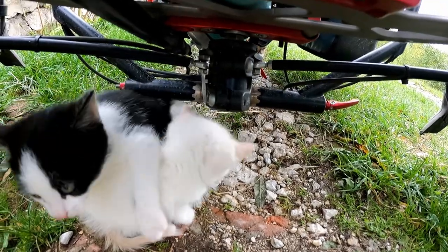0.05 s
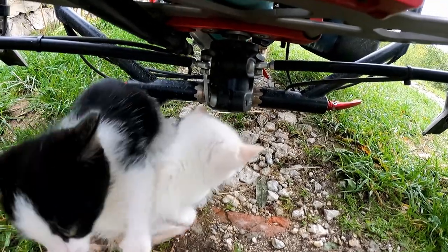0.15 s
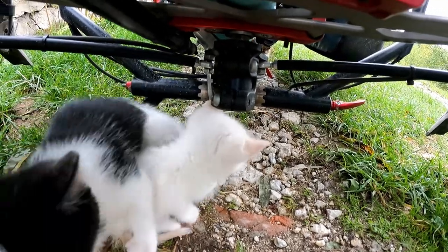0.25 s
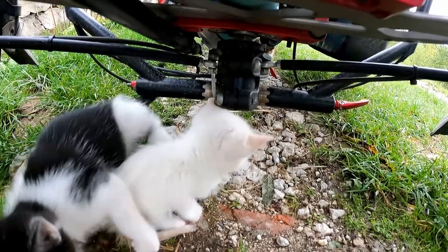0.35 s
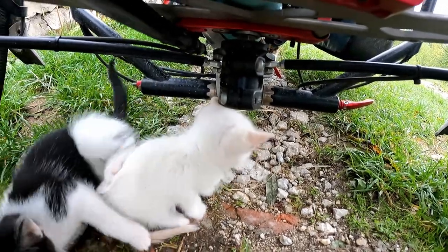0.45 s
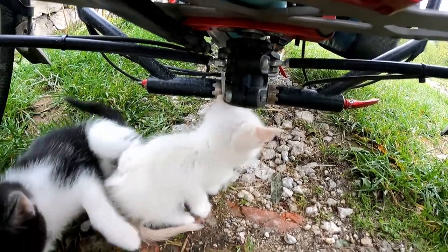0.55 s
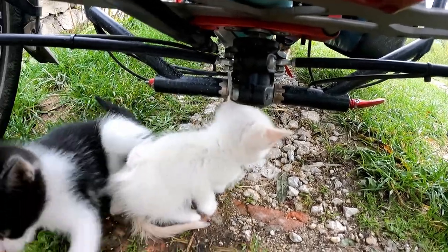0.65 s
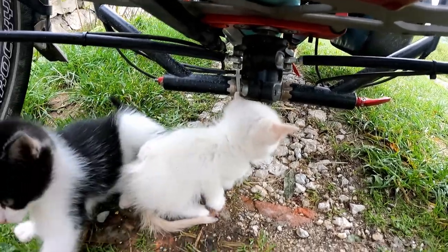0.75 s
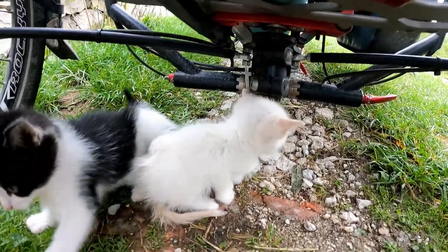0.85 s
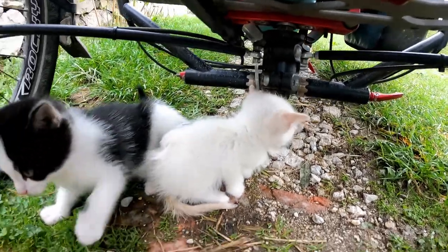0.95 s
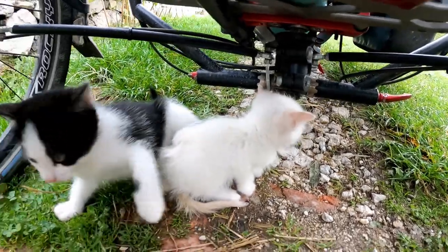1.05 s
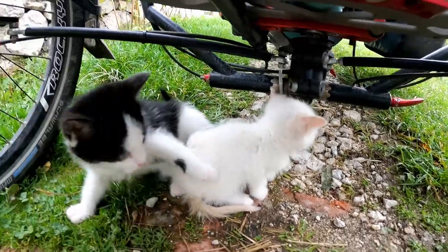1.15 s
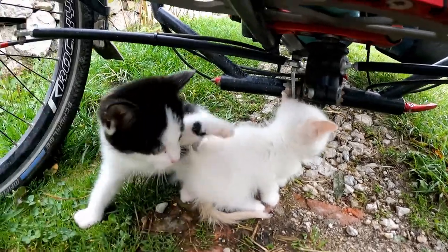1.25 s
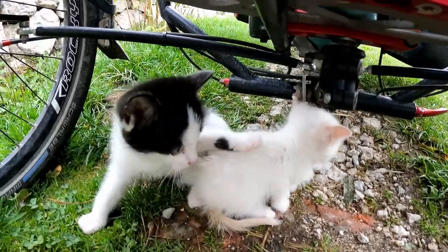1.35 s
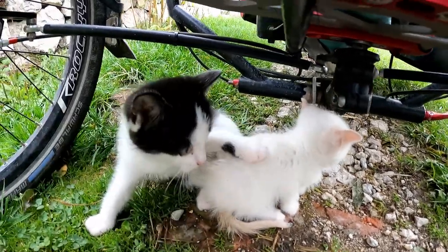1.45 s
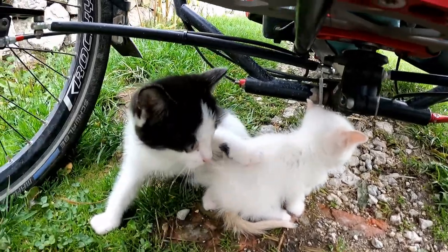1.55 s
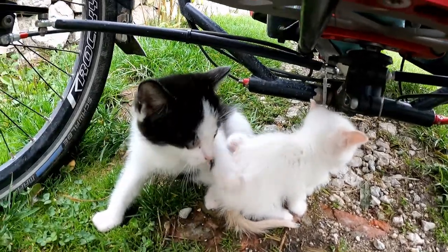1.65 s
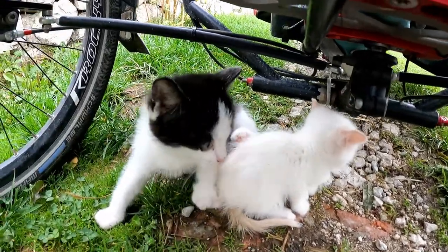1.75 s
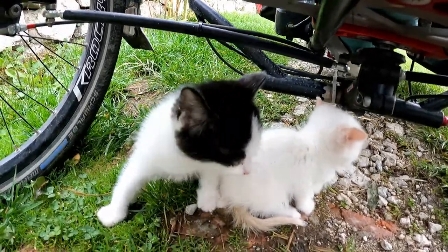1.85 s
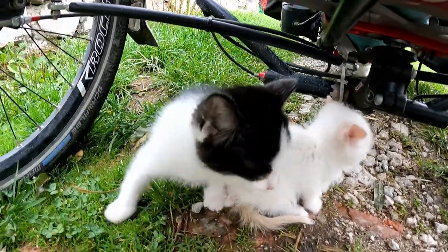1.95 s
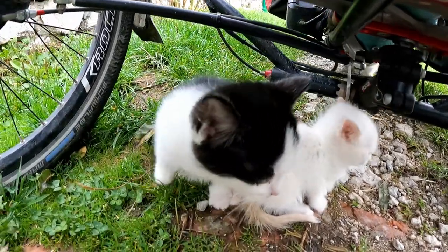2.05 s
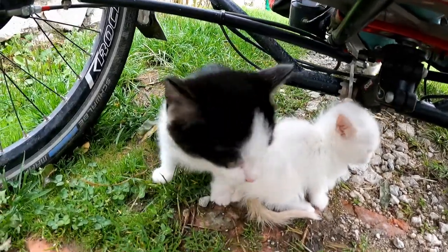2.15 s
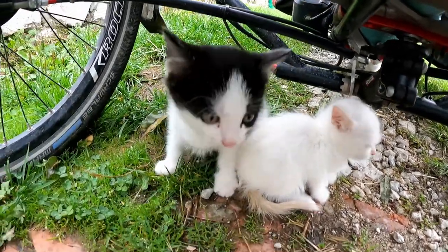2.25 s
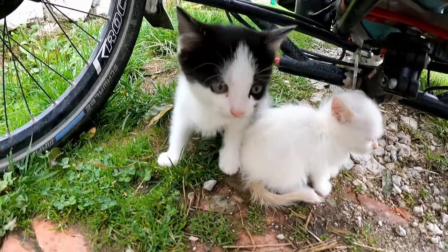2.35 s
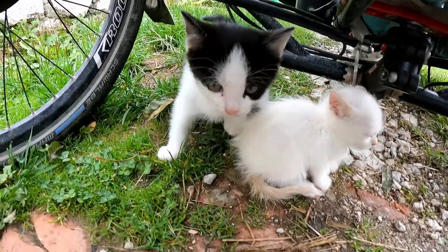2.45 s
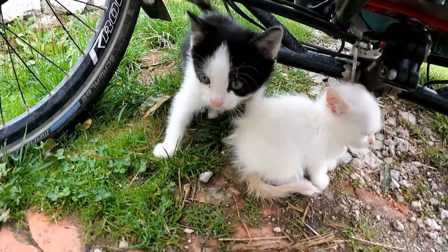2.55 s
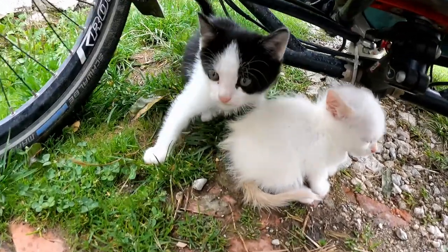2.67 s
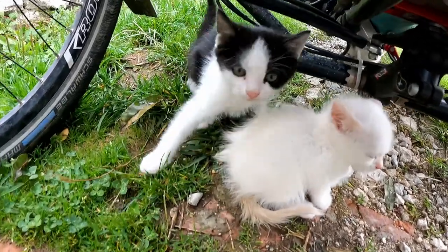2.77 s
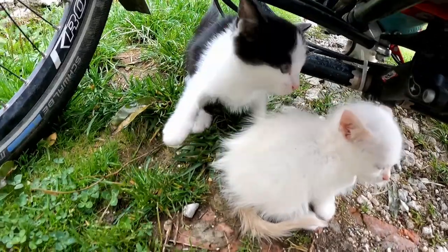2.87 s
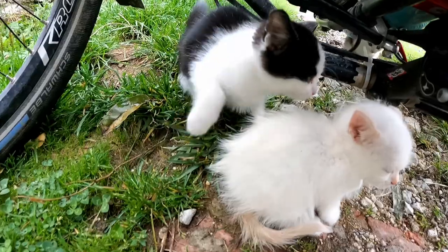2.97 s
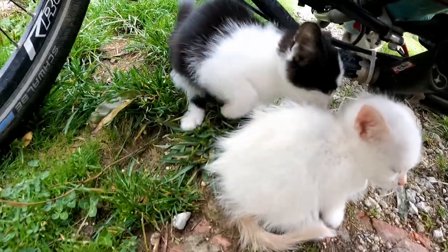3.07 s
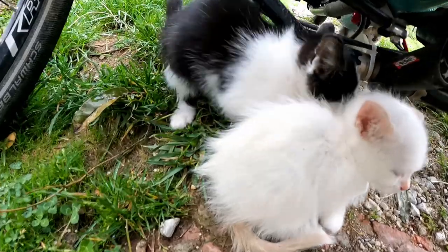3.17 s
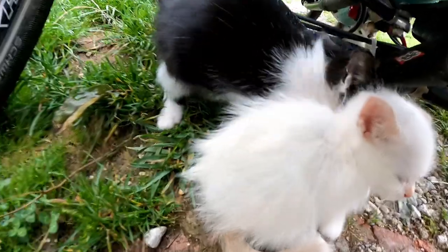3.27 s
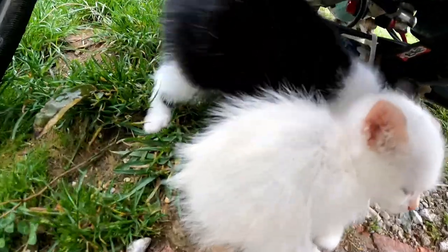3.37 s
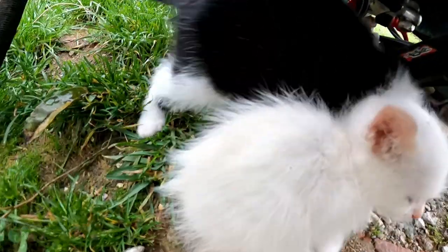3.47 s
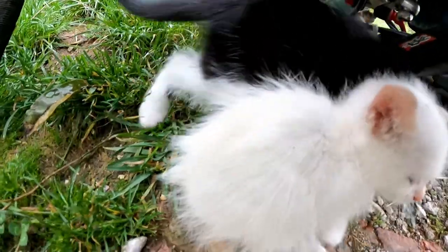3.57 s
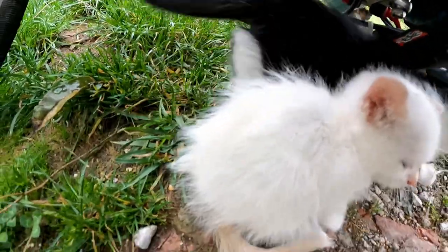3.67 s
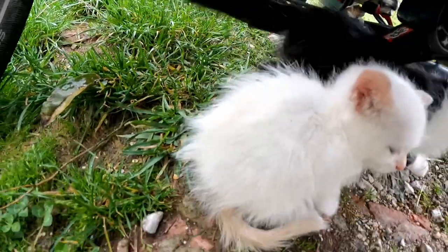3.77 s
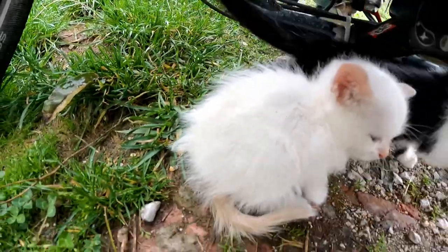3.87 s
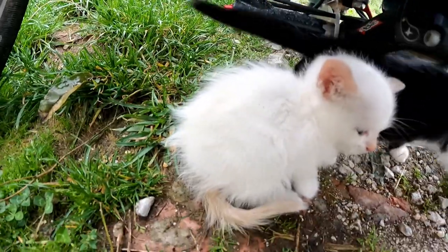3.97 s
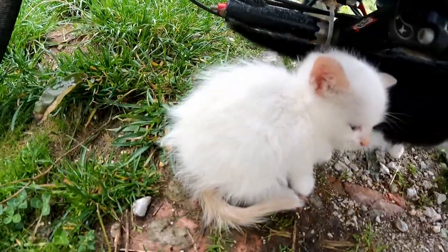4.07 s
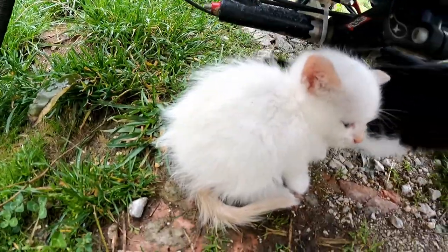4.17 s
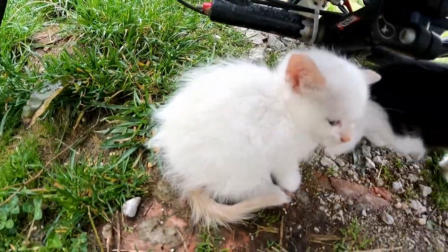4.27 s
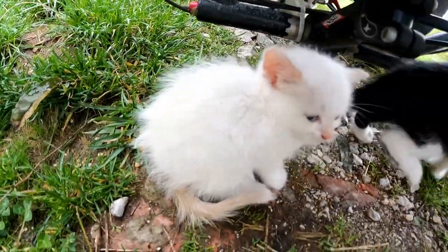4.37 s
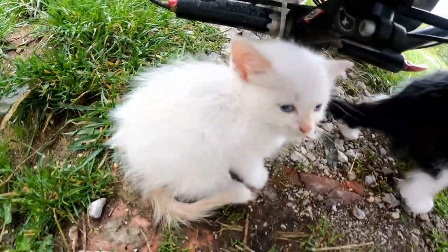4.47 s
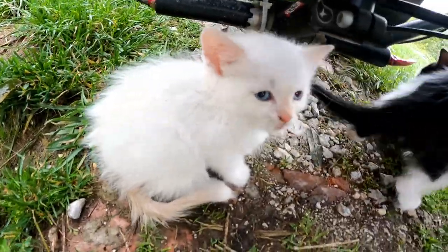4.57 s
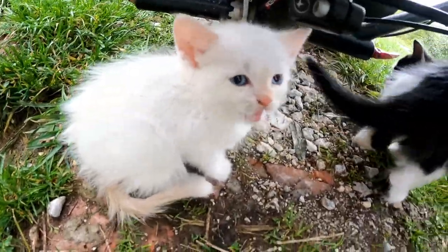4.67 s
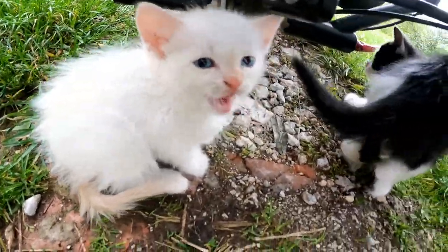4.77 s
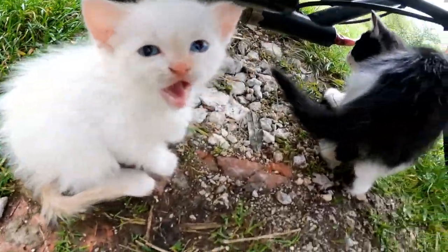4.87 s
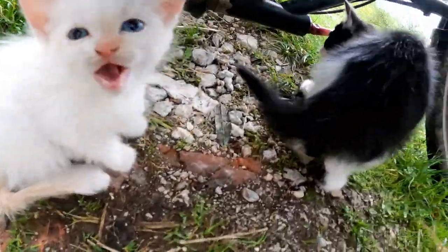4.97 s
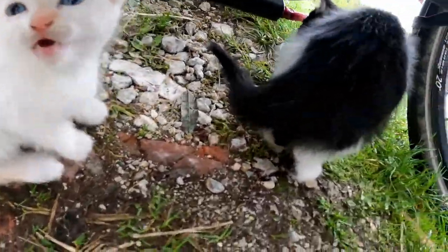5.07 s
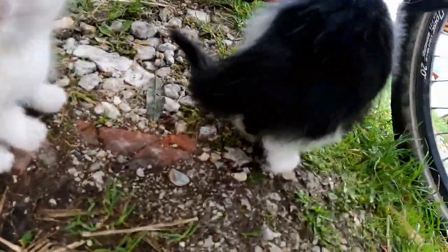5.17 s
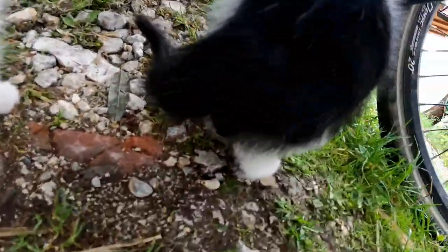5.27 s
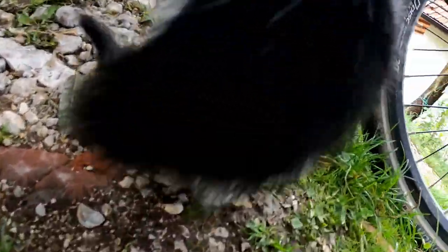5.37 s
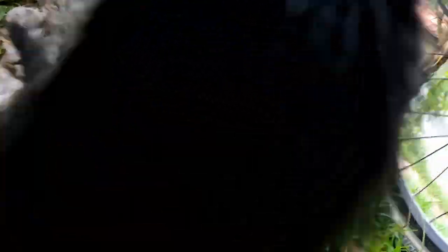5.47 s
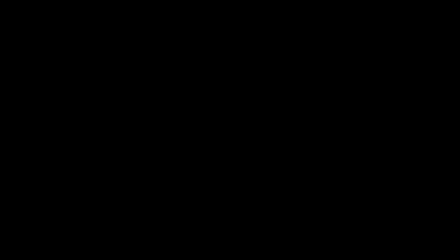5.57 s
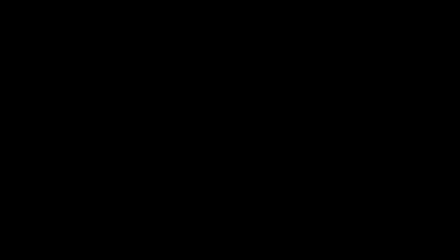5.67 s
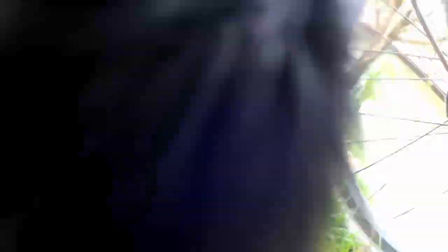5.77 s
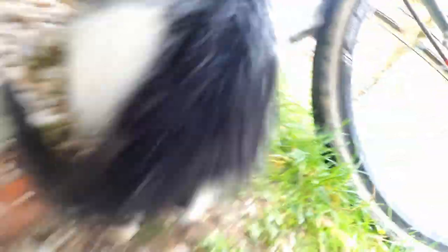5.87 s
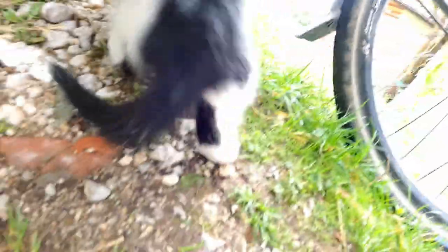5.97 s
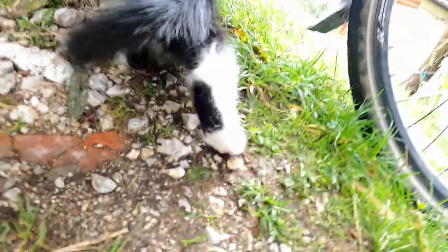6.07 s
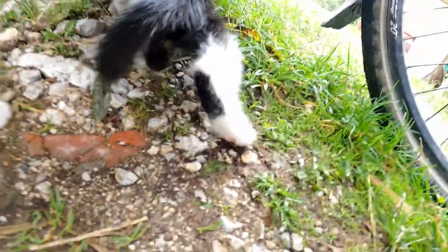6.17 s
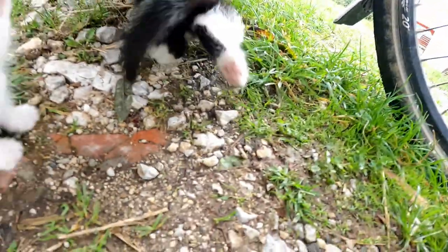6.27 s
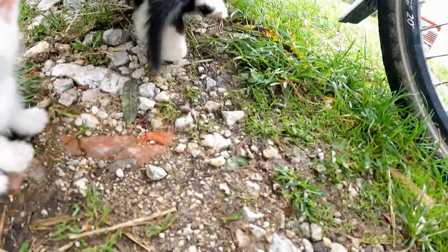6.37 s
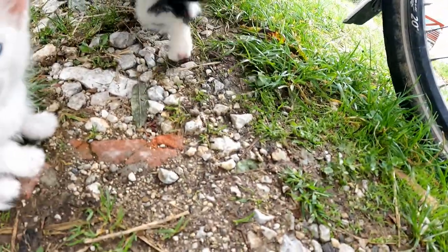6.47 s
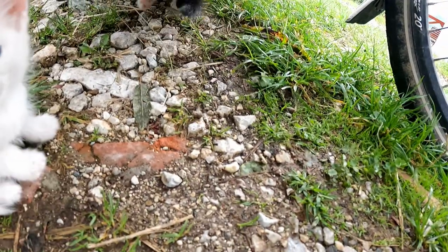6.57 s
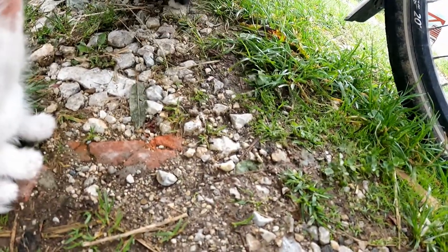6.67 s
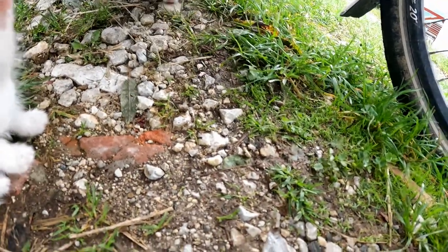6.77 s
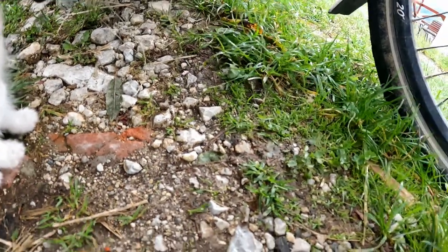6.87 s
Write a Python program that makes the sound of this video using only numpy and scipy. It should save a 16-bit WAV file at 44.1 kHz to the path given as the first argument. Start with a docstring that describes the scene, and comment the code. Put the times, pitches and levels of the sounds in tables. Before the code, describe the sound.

Outdoors, a small handheld microphone close to kittens on gravel, with faint hiss, a weak wavering low hum and soft fur rustle. A barely audible squeak comes at 0.1 s. From 0.5 to 1.5 s a clear, thin mew glides quickly up, holds, then slides down. A soft low bump at 1.6 s and small dry ticks around 1.9 to 2.3 s follow, then near quiet. At 3.35 to 3.5 s very loud, hard knocks strike in a rapid cluster with gritty scraping and a brief ringing edge. From 4.6 to 5.45 s comes a second mew, brighter and rougher, rising, cracking with breathy rasp, then falling. Small taps come at 5.3 s. At 5.65 s a heavy, deep thump hits the housing with a knock and rumble; scuffs continue to 5.9 s. A short solid clack lands at 6.4 s, then faint rustle.

```python
"""Kittens mew: stacks of harmonics on gliding pitches, lifted by resonances of mouth and housing; the last call
cracks and breathes, and its mouth closes with a short knock. Around them paws and fur rustle (grainy noise in
bands) beside a bicycle lying on gravel. Pebbles and bicycle parts get knocked (decaying modes) and a small
camera's closed housing is bumped (low swings). Handling rumble, a wavering low outdoor hum and faint hiss, all
banded noise, lie underneath."""
import sys
import numpy as np
from scipy import signal
from scipy.io import wavfile
from scipy.ndimage import uniform_filter1d

SR = 44100
rng = np.random.default_rng(int(sys.argv[2]) if len(sys.argv) > 2 else 0)


def master_out(mix):
    """Clip the mix to full scale and print it as 16-bit PCM to the path in sys.argv[1]."""
    frames = np.transpose(np.atleast_2d(mix))
    ceiling = np.clip(frames, -1, 1)
    pcm = np.round(ceiling * 32767).astype(np.int16)
    wavfile.write(sys.argv[1], SR, pcm)


N = 305613
T = np.arange(N) / SR

# Mews, one curve per call: time_s, pitch_hz, level_db of the fundamental before the resonances, # second_db and
# third_db (harmonics relative to it), fall_db per higher harmonic (small = mouth wide open)
MEW_CURVES = [
    [(.06, 547, -69.5, -25, 0, -25), (.08, 555, -68, -22.5, -11, -25), (.15, 528, -67, -25.5, -34, -25.5),
     (.18, 550, -88, -20, 0, -21)],
    [(.495, 525, -57.5, 2, 4, -24), (.512, 562.5, -47, 3, -19.5, -10), (.55, 526, -47.5, -7, -8.5, -11.5),
     (.568, 669, -55.5, -3, -15, -12), (.6, 762, -47, -4, -22, -19), (.65, 874, -40.5, -14, -37.5, -21),
     (.7, 1002, -38, -22.5, -58, -8), (.76, 1096, -42, -10.5, -26, -13.5),
     (.81, 1132, -38.5, -5, -24.5, -10), (.88, 1147, -41.5, -9, -16, -11), (.95, 1138, -43, -3, -16.5, -12),
     (1.03, 1106, -43.5, -0.5, -20, -15), (1.075, 1073, -42, 0.5, -20, -31.5),
     (1.12, 1037, -42.5, -9.5, -34.5, -27), (1.16, 1021, -36, -16, -57, -15),
     (1.27, 909.4, -34.5, -14, -63, -7.5), (1.35, 822.5, -35, -10, -58, -10.5),
     (1.43, 735.5, -40, -8, -50, -12), (1.465, 703, -50, -3, -11.5, -40), (1.5, 635, -47.5, -10, -8, -39),
     (1.52, 626, -50.5, -2, -16, -24)],
    [(4.565, 1187, -55.5, -20, -65, -9), (4.64, 1366, -50, -4, -26, -9),
     (4.69, 1426, -52.5, -1.5, -6, -9.5), (4.73, 1422, -51.5, 2.5, -1.5, -9.5),
     (4.8, 1355, -52, -1, -7, -6.5), (4.9, 1374, -53.5, 0, -6, -9)],
    [(4.592, 927, -50.5, -32, -12.5, -23), (4.603, 716, -50, -8, -8, -21),
     (4.613, 627, -50.5, -11, -25, -16), (4.625, 630, -52, -23, -21, -8)],
    [(4.6, 766, -87, -18, 6, -20), (4.625, 837, -45.5, -15, -8, -30), (4.66, 844, -43, -19, -23, -20),
     (4.7, 876, -48, -9, 4, -14), (4.73, 932, -44.5, -14, -12, -14), (4.76, 1034, -45, -0.5, -11.5, -4.5),
     (4.79, 1143, -43.5, 1.5, -7, -7), (4.82, 1170, -44, 0, -3.5, -6.5), (4.86, 1197, -39, 6.5, -13, -7.5),
     (4.9, 1224, -37, 4.5, -10.5, -8), (4.96, 1188, -36.5, 4.5, -12, -7), (5.01, 1162, -38, 5.5, -10, -7.5),
     (5.045, 1187, -35, 3.5, -9, -10.5), (5.065, 1128, -36, 3, -12, -7.5),
     (5.135, 1110, -37, 0.5, -22.5, -10), (5.165, 1044, -36, 5, -31.5, -5),
     (5.22, 997, -39.5, -4.5, -36, -5), (5.26, 952, -43.5, -13.5, -34.5, -4.5),
     (5.31, 911, -45.5, -11, -20, -14.5), (5.36, 849.5, -47.5, -3.5, -16, -13.5),
     (5.44, 784, -46.5, -9.5, -21, -15)],
]
LAST_MEW = MEW_CURVES[-1]
# Roughness of each call: one factor_0_to_1 per mew
MEW_ROUGHNESS = [.25, .07, .05, .2, .035]
# Resonances of mouth and housing that lift a passing harmonic: centre_hz, width_hz, lift_db
RESONANCES = [(915, 320, 1.5), (2100, 110, 6.5), (3102, 620, 2), (4000, 210, 2), (5300, 590, 16),
              (7100, 660, 7)]
# Lines between the harmonics while the voice cracks: multiple_of_pitch, level_db
HALF_LINES = [(.5, -11.5), (1.5, 0), (2.5, 2), (3.5, -8.5), (4.5, -8.5), (5.5, -42), (6.5, -39)]
CRACK_START_S, CRACK_END_S, CRACK_EDGE_S, CRACK_DB = 4.796, 5.052, 0.0092, -38
CRACK_ROUGHNESS = .24  # added to the call's own
SLIP_DB = 3  # how much each half line comes and goes

# Breath through the open mouth, two body bands and then the treble: centre_hz, width_hz, level_db
BREATH_BANDS = [(1730, 1560, -16.5), (2547, 1070, 0), (3800, 3400, -13.5), (5560, 1200, -6.5),
                (6540, 820, -21.5), (10230, 3400, -46.5), (13600, 2300, -36.5)]
# Strength of the breath before puffs and spurts: time_s, level_db
BREATH_CURVE = [(4.59, -100), (4.64, -71.5), (4.74, -59), (4.765, -49), (4.8, -44), (4.89, -42.5),
                (4.95, -39.5), (5.04, -47), (5.06, -53), (5.14, -60), (5.18, -85.5), (5.46, -96)]
BRIGHT_POWER = .4  # extra treble dB per dB of breath level

# Scuffs of paws and hand on gravel and housing: full_s (rise ends, hold begins), rise_s, hold_s, fall_s, level_db,
# then low_middle_db, treble_db, top_treble_db relative to it
SCUFFS = [(0.498, 0.012, .01, 0.045, -69, 14.5, -18.5, -19),
          (1.628, 0.0054, 0.013, 0.014, -64.5, -31, -3.5, -30),
          (1.75, 0.018, 0.021, 0.022, -72.5, -6, -11.5, -31),
          (1.839, 0.016, 0.042, 0.022, -66.5, -2.5, -6.5, -27),
          (1.909, 0.011, 0.034, 0.018, -60.5, -7, -2, -26.5), (2.03, .02, 0.055, .02, -84.5, -8, -8, -25),
          (2.29, 0.014, 0.051, 0.18, -77, -9, -21, -15), (3.343, 0.0098, .005, 0.014, -41.5, 3, -30, -29.5),
          (3.379, 0.0063, 0.036, .008, -33, 0, -19.5, -26),
          (3.442, .003, .01, .006, -28, -0.5, -20.5, -27.5),
          (3.469, .003, 0.016, 0.004, -36.5, 4.5, -19, -35),
          (3.498, 0.0044, 0.0084, 0.099, -73.5, 9, -11, -9),
          (5.342, 0.0081, 0.042, 0.012, -61.5, -4.5, -10, -8.5),
          (5.478, 0.035, 0.0085, 0.025, -67, -4.5, -24.5, -27),
          (5.637, 0.0073, 0.051, 0.049, -43.5, 0, -13.5, -12.5),
          (5.788, 0.033, 0.012, 0.031, -52.5, 6.5, -11, -7),
          (5.88, 0.0086, 0.019, 0.015, -50.5, -1, -23, -25),
          (5.928, .02, 0.018, 0.0052, -59, -12, -25, -31),
          (6.394, 0.007, 0.017, .006, -50.5, -2, -31.5, -46),
          (6.475, 0.011, .015, 0.0084, -62.5, 2.5, -23, -30),
          (6.5, 0.014, .01, 0.0098, -54.5, 4.5, -23, -33)]
# Quiet stirring of fur and grass: time_s, level_db
STIR_CURVE = [(0, -87), (.19, -77.5), (.3, -81), (.38, -73.5), (.5, -83), (.66, -76), (1.5, -84.5),
              (2.12, -90), (2.3, -85.5), (2.6, -87), (2.8, -81.5), (2.95, -76), (3.2, -75.5), (3.3, -86.5),
              (3.6, -75.5), (3.76, -86.5), (4.22, -94), (5.3, -84), (6.18, -83), (6.61, -90.5),
              (6.9, -80.5)]
STIR_LOW_DB, STIR_TREBLE_DB = 0, -10.5  # relative to the stirring
# Rustle colour, main range: centre_hz, width_hz, level_db
RUSTLE_MAIN = [(1930, 430, -4.5), (2418, 590, -5), (2919, 400, -13.5)]
# Rustle colour, low-middle range: centre_hz, width_hz, level_db
RUSTLE_LOW = [(430, 260, -12), (923, 510, -6.5), (1298, 500, -3.5)]
# Rustle colour, three treble and three top treble bands: centre_hz, width_hz, level_db
RUSTLE_TREBLE = [(3460, 1100, -1), (4700, 1200, -7.5), (5650, 1200, -12), (7240, 2000, -8),
                 (9100, 2000, -21.5), (13000, 3500, -28)]
# Grit thrown by each broad knock: level under its peak, decay, treble relative to the grit
SPRAY_DB, SPRAY_S, SPRAY_TREBLE_DB = -17.5, 0.005, -19

# Knocks, and the last mew's mouth closing at 5.442 s; entries of narrow spread are short tones, two of them
# just before the loud blow: # start_s, peak_db before the housing thins the bass, centre_hz of the sounding
# part, spread_octaves, # ring_factor on the mode decay
KNOCKS = [(0.443, -55, 1280, 0.5, 0.5), (1.628, -57, 2560, 0.63, 0.47), (1.903, -45, 2930, 0.28, 0.56),
          (1.939, -41.5, 3400, 0.46, 0.15), (1.964, -55, 880, 0.48, 0.33), (2.289, -53, 2300, 0.21, 0.37),
          (2.307, -53, 1980, 0.53, 0.27), (2.954, -50, 1770, 0.51, 0.53), (3.168, -47.5, 1480, 0.96, 0.72),
          (3.354, -8, 2480, 1.4, 0.76), (3.375, -20.5, 812, 0.52, 1.8), (3.404, -20, 809, 0.59, 0.7),
          (3.426, -7, 1210, 0.74, 0.55), (3.441, -21, 2070, 0.86, 0.68), (3.468, -21, 1700, 0.87, 0.45),
          (3.481, -22.5, 2030, 0.8, 0.31), (3.594, -46.5, 1490, 0.35, 0.24),
          (3.877, -69.5, 1650, 0.94, 0.26), (3.942, -49.5, 1860, 0.69, 0.46), (4.447, -55, 986, 1, 0.35),
          (5.629, -44.5, 1890, 0.8, 0.17), (5.687, -28.5, 1080, 0.83, 0.87), (5.877, -47, 1360, 0.82, 0.4),
          (5.896, -50, 2340, 1.05, 0.54), (6.095, -53.5, 2080, 1.05, 0.29), (6.175, -55, 1810, 1.47, 0.42),
          (6.401, -27.5, 1170, 1.08, 0.68), (6.468, -59, 872, 1.1, 0.39), (6.497, -47, 853, 1.6, 0.19),
          (6.704, -63, 1276, 1.16, 0.31), (1.519, -38, 925, 0.081, 0.63), (3.329, -35, 2480, 0.09, 0.52),
          (3.34, -24.5, 2500, 0.093, 2.7), (3.354, -18, 2610, 0.13, 1.1), (3.486, -34, 991, 0.092, 3.3),
          (3.482, -32.5, 1950, 0.12, 0.63), (5.23, -50, 1450, 0.12, 1.4), (5.307, -40, 1794, 0.11, 1),
          (5.34, -39, 1840, 0.27, 0.86), (5.442, -39.5, 860, 0.33, 0.35), (6.388, -44, 2470, 0.11, 0.58),
          (6.402, -47, 5370, 0.4, 0.24)]
# Ringing modes of the struck parts: mode_hz, level_db, t60_s at ring factor 1
PART_MODES = [(573, -2.5, 0.062), (830, -2.5, .06), (918, -3, 0.042), (1029.6, 3.5, 0.035),
              (1225, 8.5, 0.03), (1500, 4.5, 0.018), (1733, 4, .05), (1900, -1.5, 0.089),
              (2188, -1.5, 0.045), (2456, -8.5, .06), (2830, -13.5, .05), (3250, -11.5, 0.084),
              (3800, -19.5, .03), (3940, -18, .03), (5580, -17.5, 0.064), (7175, -27, .02),
              (9510, -43, .015), (13000, -54.5, .01)]
HOUSING_HZ = 552.2  # knocks lose their bass in the small housing

# Bumps of the housing: turn_s (buildup ends, decaying swing begins), swing_db, swing_hz, t60_s, buildup_s
BUMPS = [(1.636, -32.5, 58.2, 0.069, 0.0011), (5.652, -3.5, 40.55, 0.1, 0.0041),
         (5.694, -31, 31.4, 0.66, 0.006)]

# Jolts of the hand-held housing: full_s (rise ends, hold begins), rise_s, hold_s, fall_s, rumble_db, hum_db
JOLTS = [(.01, 0.018, .01, 0.036, -66, -75), (0.285, 0.011, .02, 0.15, -61, -73.5),
         (0.847, 0.034, .02, .07, -61.5, -84.5), (1.49, 0.047, .01, 0.041, -66, -77),
         (1.627, 0.0099, .08, 0.066, -52.5, -65.5), (2.97, 0.017, .01, 0.033, -61, -60.5),
         (3.353, 0.021, .13, 0.037, -40, -49.5), (3.701, 0.052, .02, 0.048, -67.5, -79),
         (2.415, 0.015, 0.0085, .03, -80, -82), (2.715, 0.028, 0.013, .03, -79.5, -67),
         (3.163, .02, .03, .03, -77, -65), (4.101, 0.041, .01, 0.028, -67, -77),
         (4.968, 0.079, .01, 0.054, -63.5, -72.5), (5.36, 0.029, .01, .02, -55, -58.5),
         (5.637, 0.01, .08, 0.043, -35.5, -47.5), (6.107, 0.015, 0.0065, .04, -75.5, -61.5),
         (5.825, 0.043, .01, 0.055, -50, -59), (6.407, 0.032, .05, 0.049, -56, -55.5)]
# Handling rumble: centre_hz, width_hz, level_db
RUMBLE_BANDS = [(32.7, 49, -8.5), (62.56, 34, -5), (93.5, 11, -13)]
# Outdoor hum: centre_hz, width_hz, level_db
HUM_BANDS = [(138.9, 40, -5), (189.6, 70, -1), (270, 90, -9), (363, 180, -18)]
# Far air and preamp hiss: centre_hz, width_hz, level_db
AIR_BANDS = [(437, 260, -89), (593, 75, -88), (1000, 800, -96.5), (1960, 1000, -97.5), (4500, 4000, -100),
             (10000, 13000, -99)]
RUMBLE_DB, RUMBLE_SWAY_DB = -79, 7.5
HUM_DB, HUM_SWAY_DB = -73.5, 3
TOP_HZ = 15500


def mew(table, rough):
    """Harmonics of vocal folds on one pitch, lifted by resonances; roughness shakes each line, a crack adds
    half lines."""
    span = slice(int(table[0][0] * SR), int(table[-1][0] * SR))
    hz, level_db, second_db, third_db, fall_db = (c[span] for c in columns(table))
    hz = uniform_filter1d(hz, size=500, mode="nearest")
    count = len(hz)
    harmonics_db = [0, second_db] + [third_db + fall_db * k for k in range(10)]
    lines = []
    for multiple, relative_db in enumerate(harmonics_db, start=1):
        lines.append((multiple, undb(level_db + relative_db + resonance_lift_db(multiple * hz))))

    if table is LAST_MEW:
        edge_distance_s = np.minimum(T[span] - CRACK_START_S, CRACK_END_S - T[span])
        crack = np.clip(edge_distance_s / CRACK_EDGE_S, 0, 1)
        rough = rough + CRACK_ROUGHNESS * crack
        for multiple, relative_db in HALF_LINES:
            slip_db = SLIP_DB * walk(29.83, count)
            lines.append((multiple, crack * undb(CRACK_DB + relative_db + slip_db)))

    hz = hz * (1 + .015 * rough * walk(80, count))
    phase = 2 * np.pi * np.cumsum(hz) / SR
    voice = np.zeros(N)
    for multiple, gain in lines:
        # uneven cycles smear the higher lines more, in strength and in phase
        wobble = .6 * walk(420, count) + 1j * walk(420, count)
        shake = .6 * rough * multiple ** .9 * wobble
        line = np.exp(1j * (multiple * phase + multiple * multiple))
        voice[span] += np.sqrt(2) * gain * np.imag((1 + shake) * line)
    voice[span] *= signal.windows.tukey(count, 0.0026 * SR / count)
    return voice


def resonance_lift_db(hz):
    """Resonances of the mouth cavity and the housing raise whatever passes near their centres."""
    return sum(lift / (1 + (2 * (hz - centre) / width) ** 2) for centre, width, lift in RESONANCES)


def breath():
    """Turbulent air through the mouth in the last mew, puffed once per two pitch cycles, brighter when strong."""
    during = (T > BREATH_CURVE[0][0]) & (T < BREATH_CURVE[-1][0])
    level_db = columns(BREATH_CURVE)[0]
    pitch_hz = columns(LAST_MEW)[0]
    puffs = 1 + .8 * np.sin(np.pi * np.cumsum(pitch_hz) / SR)
    spurts_db = 2.5 * walk(150)
    body = flicker(BREATH_BANDS[:2], noise, 1.9, 60)
    brightness = undb(BRIGHT_POWER * (level_db - level_db.max()))
    treble = flicker(BREATH_BANDS[2:], noise, 1.602, 60)
    return during * puffs * undb(level_db + spurts_db) * (body + brightness * treble)


def rustle():
    """Grains coloured by the housing, in four ranges: stirring, scuffs and the grit of knocks."""
    stir_colour_db = np.array([[0], [STIR_LOW_DB], [STIR_TREBLE_DB], [STIR_TREBLE_DB]])
    levels = undb(columns(STIR_CURVE)[0] + stir_colour_db)
    sprays = [(s, .002, .001, SPRAY_S, peak_db + SPRAY_DB, 0, SPRAY_TREBLE_DB, SPRAY_TREBLE_DB)
              for s, peak_db, _, spread, _ in KNOCKS if spread > .5]
    for full_s, rise, hold, fall, db, *colour_db in SCUFFS + sprays:
        range_gains = undb(db + np.array([0] + colour_db))[:, None]
        levels = levels + swell(full_s, rise, hold, fall) * range_gains
    ranges = RUSTLE_MAIN, RUSTLE_LOW, RUSTLE_TREBLE[:3], RUSTLE_TREBLE[3:]
    return sum(gain * flicker(bands, grit, 2.2, 60) for gain, bands in zip(levels, ranges))


def grit():
    """Dense single-sample grains of unequal size, about 1500 a second, over a fine brushing."""
    grains = rng.random(N) < 1500 / SR
    size = 6.0 * undb(1.6 * rng.exponential(size=N))
    return noise() * (1 + grains * size)


def knocks():
    """Each entry rings all modes at once, strongest near its centre, in a housing that thins the bass."""
    out, t = np.zeros(N + SR), np.arange(SR // 4) / SR
    mode_hz, mode_db, t60 = np.transpose(PART_MODES)[:, :, None]
    for s, peak_db, centre_hz, spread, ring in KNOCKS:
        level_chance, tuning_chance, phase_chance = rng.standard_normal((3, len(mode_hz), 1))
        near_db = -6 * (np.log2(mode_hz / centre_hz) / max(spread, .05)) ** 2
        near_db = np.maximum(near_db, -12 / spread)
        gain = undb(mode_db + near_db + 3.4 * min(spread, 1) * level_chance)
        hz = mode_hz * (1 + .01 * spread * tuning_chance)
        decay = np.exp(-np.log(1000) * t / (t60 * ring))
        hit = np.sum(gain * np.sin(2 * np.pi * hz * t + .3 * phase_chance) * decay, axis=0)
        push_s = (.0002 - .000015 * peak_db) / spread  # weak and narrow entries swell in longer
        hit = hit * np.sin(np.pi / 2 * np.minimum(t / push_s, 1)) ** 2
        hit = hit / np.abs(hit).max()
        i = int(s * SR)
        out[i:i + len(t)] += undb(peak_db) * hit
    return signal.sosfilt(signal.butter(2, HOUSING_HZ, "high", fs=SR, output="sos"), out[:N])


def bumps():
    """The housing is pushed in, then swings back on its mount as a decaying low sine."""
    out = 0
    for turn_s, db, hz, t60, buildup in BUMPS:
        t = T - turn_s
        envelope = np.exp(np.minimum(t, 0) / buildup - np.log(1000) * np.maximum(t, 0) / t60)
        out = out + undb(db) * envelope * np.sin(2 * np.pi * hz * t)
    return out


def rumble_and_hum():
    """Handling rumble below a wavering outdoor hum, two sets of noise bands both raised by jolts."""
    rumble = undb(RUMBLE_DB + RUMBLE_SWAY_DB * walk(8))
    hum = undb(HUM_DB + HUM_SWAY_DB * walk(16))
    for *shape, rumble_db, hum_db in JOLTS:
        jolt = swell(*shape)
        rumble = rumble + undb(rumble_db) * jolt
        hum = hum + undb(hum_db) * jolt
    return rumble * flicker(RUMBLE_BANDS, noise, 2.6, 15) + hum * flicker(HUM_BANDS, noise, 1.4, 10)


def far_air():
    """Far air and preamp hiss: faint noise bands that waver slowly."""
    return flicker(AIR_BANDS, noise, 1.1, 2.5)


def undb(db):
    """Decibels to amplitude."""
    return 10 ** (np.asarray(db) / 20)


def columns(table):
    """Table columns as curves over all samples, the first column being time."""
    s, *rest = np.transpose(table)
    return [np.interp(T, s, c) for c in rest]


def noise():
    """White noise, rms 1."""
    return rng.standard_normal(N)


def band(x, hz, width, order=3):
    """Band-pass scaled to rms 1."""
    sos = signal.butter(order, [hz - width / 2, hz + width / 2], "band", fs=SR, output="sos")
    y = signal.sosfilt(sos, x)
    return y / np.std(y)


def walk(rate, count=N):
    """Random levels held 1 / rate s and smoothed three times; spread 1."""
    hold = int(SR / rate)
    y = np.repeat(rng.standard_normal(count // hold + 1), hold)
    for _ in range(3):
        y = uniform_filter1d(y, hold)
    return y[:count] / np.std(y)


def flicker(bands, source, flicker_db, rate):
    """Bands of a source, each wavering in level on its own; rms near the table's dB."""
    return sum(undb(db + flicker_db * walk(rate)) * band(source(), hz, width) for hz, width, db in bands)


def swell(full_s, rise, hold, fall):
    """Exponential rise up to full_s, a hold, an exponential fall."""
    before = np.minimum(T - full_s, 0) / max(rise, .001)
    after = np.maximum(T - full_s - hold, 0) / max(fall, .001)
    return np.exp(before - after)


def scene():
    """All sources summed to one channel."""
    kittens = sum(mew(table, rough) for table, rough in zip(MEW_CURVES, MEW_ROUGHNESS)) + breath()
    return (kittens + rustle() + knocks() + bumps() + rumble_and_hum() + far_air())[None]


def record(dry):
    """The camera cuts the top with a steep low-pass."""
    return signal.sosfilt(signal.ellip(8, .2, 70, TOP_HZ, fs=SR, output="sos"), dry)


dry = scene()
out = record(dry)
master_out(out)
```